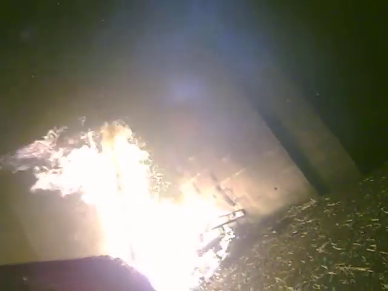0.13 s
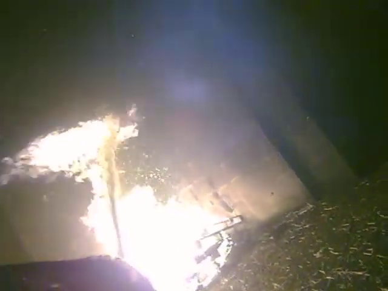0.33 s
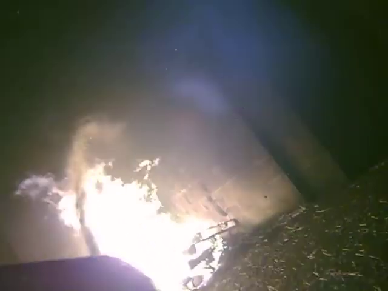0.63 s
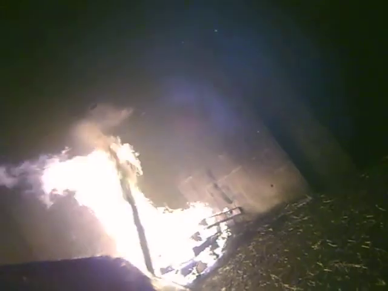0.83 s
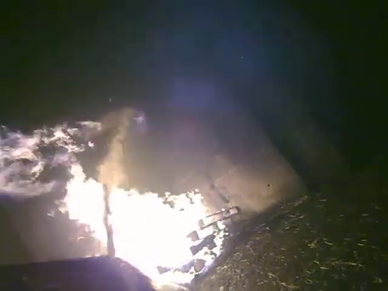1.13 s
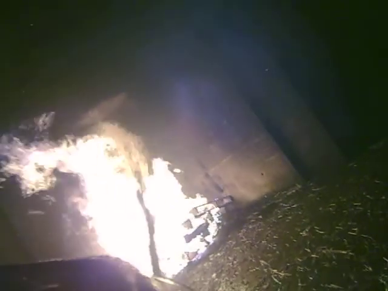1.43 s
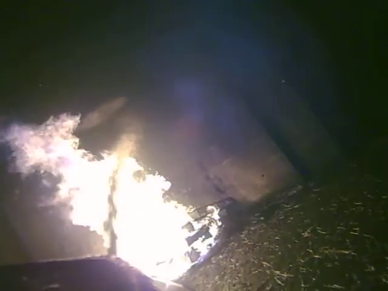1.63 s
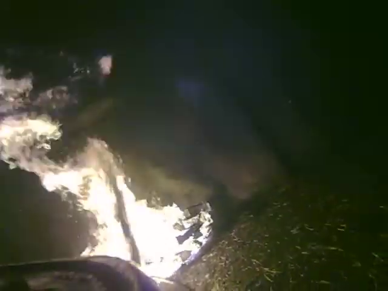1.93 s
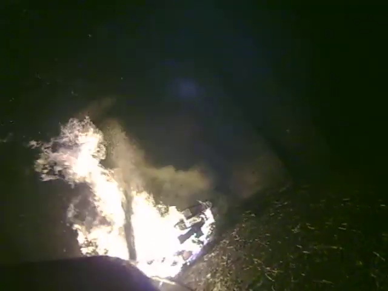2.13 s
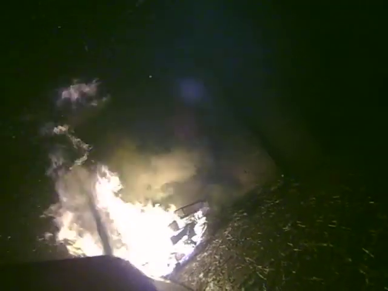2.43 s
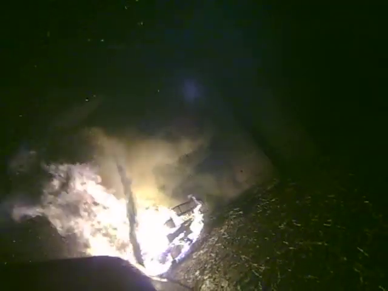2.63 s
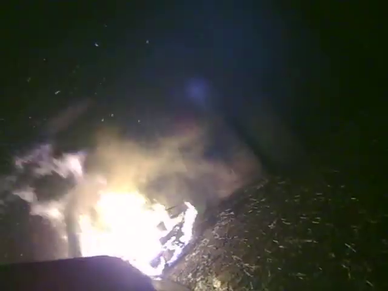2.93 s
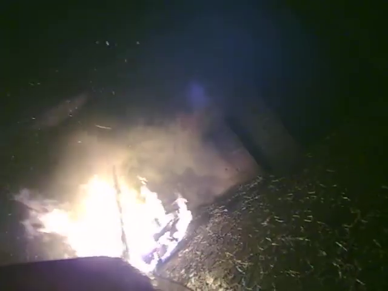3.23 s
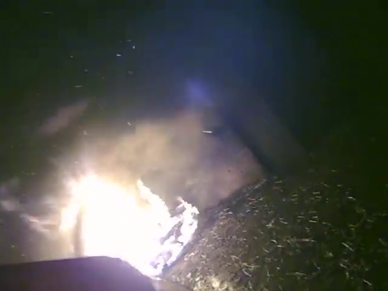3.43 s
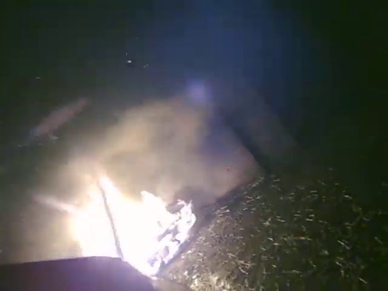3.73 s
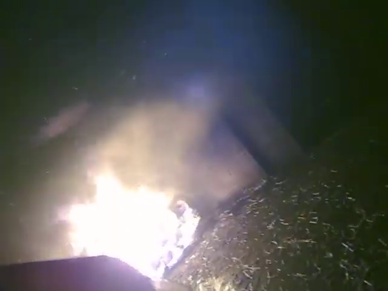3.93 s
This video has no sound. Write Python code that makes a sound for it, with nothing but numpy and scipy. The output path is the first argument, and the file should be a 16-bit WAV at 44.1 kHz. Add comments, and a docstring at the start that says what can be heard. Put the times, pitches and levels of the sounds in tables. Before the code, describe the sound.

A fire hose sprays burning wooden pallets in hissing, spattering sweeps, with occasional dull knocks and a soft rumble of flames underneath.

```python
"""A concrete burn room: a fire hose plays on burning pallets and straw, heard by a camera in a case.
Underneath sit the soft rumble of the flames and a faint low flutter from the camera's electronics.
The jet slackens, opens up again and sweeps the pile about three times a second. Each sweep spatters,
hisses and drums on the wood, then runs off; now and then the jet spits or knocks on a board.
The walls give the water a short tail, and the protective case adds a midrange ring."""
import sys
import numpy as np
from scipy import signal
from scipy.io import wavfile
from scipy.ndimage import uniform_filter1d

SR = 44100
rng = np.random.default_rng(int(sys.argv[2]) if len(sys.argv) > 2 else 0)


def put_to_file(sound):
    """Save the sound as 16-bit audio at rate SR, in the file named by the first command-line argument."""
    columns = np.atleast_2d(sound).T  # one column per channel
    safe = np.clip(columns, -1, 1)
    whole_steps = np.round(safe * 32767)
    wavfile.write(sys.argv[1], SR, whole_steps.astype(np.int16))


N = 179531
TIME = np.arange(N) / SR

# Resonances of the camera case: (frequency [Hz], half-width [Hz], boost [dB])
CASE_RESONANCES = [(1262, 64, 6), (1681, 106, 7.5), (1931, 158, 10.5), (2375, 130, -7.5), (2724, 120, 4.5),
                   (3334, 222, 11), (3930, 130, -2), (3883, 242, 9), (4160, 166, 8), (4790, 270, 4.5),
                   (6870, 160, 1.5), (7460, 340, -4), (8700, 270, 6), (10130, 880, 6.5), (11320, 230, 2.5),
                   (14900, 450, 5)]
# Fuzzy tones while the jet stays on one spot:
# (start [s], end [s], pitch [Hz], width [Hz], level [dB])
DWELL_TONES = [(1.1, 2.4, 218, 60, -41), (.70, .92, 195, 45, -39), (1.45, 2.3, 2670, 140, -35),
               (1.55, 2.14, 5270, 170, -32), (1.35, 1.54, 5550, 350, -34)]
# Dull knocks of the jet on the wood: (time [s], level [dB], pitch [Hz], 60 dB decay time [s])
BOARD_KNOCKS = [(.560, -16.5, 360, 0.054), (0.564, -22.5, 162, 0.088), (.785, -21, 362, 0.061),
                (0.896, -20.5, 483, 0.033), (1.734, -15.5, 78, 0.035), (2.194, -20, 310, 0.054),
                (3.078, -14.5, 183, 0.12)]
# Short spits of spray: (time [s], level [dB], length [s], centre [Hz], half-width [octaves])
JET_SPITS = [(0.066, -16, 0.01, 5800, 1.5), (0.087, -23, 0.014, 6000, 1.4), (0.26, -33, 0.0099, 7000, 0.73),
             (.365, -28.5, 0.043, 4340, .5), (.521, -17, 0.0073, 9000, 1.6), (.578, -15.5, .01, 9000, 2.7),
             (0.709, -21, .005, 12200, .45), (0.873, -18, 0.0058, 7000, 1), (1.102, -16.5, 0.017, 6000, 2),
             (1.375, -23, 0.0077, 10000, .6), (1.394, -21.5, 0.026, 7000, .63),
             (1.956, -16.5, 0.018, 4500, 1), (2.536, -10.5, 0.017, 8000, 1.16),
             (3.075, -16, 0.026, 1540, 0.95), (3.134, -16.5, 0.011, 3520, 0.26),
             (3.46, -15, .012, 10200, 0.49), (3.5, -15.5, 0.015, 5940, 1.2),
             (3.693, -13, 0.0051, 6400, .36)]
# EQ curves of the five water layers: (frequency [Hz], relative level [dB])
SPATTER_EQ = [(500, -39.5), (850, -17.5), (1020, -1.5), (1500, -1), (2100, 0.5), (2600, -8.5), (4000, -13),
              (8000, -36)]
RUSH_EQ = [(1200, -22.5), (2300, 3), (3000, -1.5), (4500, -0.5), (5400, 0), (6300, -7), (8000, -4),
           (14000, -36.5)]
MIST_EQ = [(2000, -24), (4500, -5.5), (6500, -1.5), (8000, -2.5), (10000, -0.5), (11700, 4), (13000, -0.5),
           (13800, -10), (15700, -9.5)]
PATTER_EQ = [(250, -24.5), (420, -7.5), (600, 1.5), (800, -1.5), (1200, -1), (2500, -19), (6000, -38)]
DRUM_EQ = [(30, -13), (90, -2), (140, 0.5), (200, 7), (290, -1), (400, 1.5), (600, -17), (1500, -26.5)]
# The nozzle is throttled, opened again and twice eased a little: (time [s], flow [dB])
NOZZLE_FLOW = [(0, -2.5), (.05, -8), (.105, -8), (.14, -14), (.22, -18), (.28, -13.5), (.36, -12),
               (.372, -6), (.50, -3.5), (.54, 0), (2.05, 0.5), (2.25, -1), (2.5, 0.5), (3.2, 0), (3.37, -2),
               (3.5, 0)]
# Passes of the jet over the pallets, with levels at a flow of 0 dB:
# (start [s], rise [s], hold [s], spatter level [dB], rush level [dB], wood level [dB])
JET_SWEEPS = [(.39, 0.036, .04, -30, -38, -37.5), (0.54, 0.038, 0.17, -21.5, -22.5, -33.5),
              (.73, 0.098, .06, -19, -21, -29.5), (1.083, .07, 0.041, -16.5, -23, -35),
              (1.385, 0.029, 0.13, -20.5, -24.5, -30.5), (1.678, 0.018, 0.023, -20, -20.5, -36),
              (1.913, 0.035, 0.065, -20, -22, -35.5), (2.21, 0.052, .08, -31, -36, -34.5),
              (2.462, 0.014, 0.09, -19.5, -19.5, -31), (2.837, 0.02, 0.047, -27, -23.5, -54),
              (3.068, 0.012, 0.098, -16.5, -20.5, -29.5), (3.456, .04, 0.017, -28.5, -27.5, -46),
              (3.587, .035, 0.045, -18.5, -18.5, -29.5), (3.67, 0.04, 0.073, -19, -23, -35),
              (4.022, .015, 0.011, -37, -31, -32.5)]


def gain_of(db):
    """Decibels to amplitude."""
    return 10 ** (np.asarray(db) / 20)


def unit_rms(x):
    """Scales to an rms of one."""
    return x / np.sqrt(np.mean(x ** 2) + 1e-20)


def add(mix, start_s, sound):
    """Lays a sound into the mix."""
    part = mix[max(round(start_s * SR), 0):][:len(sound)]
    part += sound[:len(part)]


def concrete_room(x, t60_s=0.45, wet_db=-14):
    """Concrete walls return a dense, short tail after a 6 ms pre-delay."""
    t = TIME[:SR // 2]
    tail = rng.standard_normal(len(t)) * gain_of(-60 * t / t60_s) * (t > 0.006)
    return x + gain_of(wet_db) * signal.oaconvolve(x, tail / np.linalg.norm(tail))[:N]


def camera_case(x, eq, size=2048):
    """Applies an EQ curve (dB as a function of Hz) and lets the case ring after every impact."""
    hz = abs(np.fft.fftfreq(size, 1 / SR))
    case_db = sum(boost * np.exp(-((hz - centre) / width) ** 2) for centre, width, boost in CASE_RESONANCES)
    log_gain = np.log(gain_of(eq(hz) + case_db))
    minimum_phase = np.exp(np.conj(signal.hilbert(log_gain)))
    return signal.oaconvolve(x, np.fft.ifft(minimum_phase).real)[:len(x)]


def fire_rumble(level_db=-41, band_hz=(20, 130)):
    """The flames lay down a soft, low bed of noise."""
    band = signal.butter(2, band_hz, "bandpass", fs=SR, output="sos")
    return gain_of(level_db) * unit_rms(signal.sosfilt(band, rng.standard_normal(N)))


def camera_flutter(frame_hz=29.98, deepest_db=-23, width_s=0.0027, jitter_s=0.0013):
    """The camera's supply dips once for each picture, by an uneven amount and not quite on the beat."""
    frame = np.round(TIME * frame_hz).astype(int)
    depth, late_s = rng.uniform([0.2, -jitter_s], [1, jitter_s], (frame[-1] + 1, 2))[frame].T
    from_dip_s = TIME - frame / frame_hz - late_s
    dips = -depth * np.exp(-(from_dip_s / width_s) ** 2) * (frame > 0)
    return gain_of(deepest_db) * (dips - dips.mean())


def dwell_tones():
    """The jet keeps a narrow resonance ringing for as long as it stays on one spot."""
    out = np.zeros(N)
    for start, end, hz, width_hz, db in DWELL_TONES:
        t = TIME[:round((end - start) * SR)]
        smooth = signal.butter(2, width_hz / 2, fs=SR, output="sos")
        waver = signal.sosfilt(smooth, rng.standard_normal(len(t)) + 1j * rng.standard_normal(len(t)))
        ring = unit_rms((waver * np.exp(2j * np.pi * hz * t)).real)
        add(out, start, gain_of(db) * ring * signal.windows.tukey(len(t), 0.5))
    return out


def board_knocks(attack_s=0.003, roughness=0.13):
    """A board thuds on one damped low mode, roughened by the water on it."""
    out, t = np.zeros(N), TIME[:SR // 4]
    for start, db, hz, t60_s in BOARD_KNOCKS:
        grit = unit_rms(uniform_filter1d(rng.standard_normal(len(t)), size=110))
        ring = np.sin(2 * np.pi * hz * t) * (1 + roughness * grit)
        envelope = np.minimum(t / attack_s, 1) * gain_of(-60 * t / t60_s)
        add(out, start, gain_of(db) * envelope * ring)
    return out


def jet_spits(attack_s=0.00088, fade_s=0.0022, top_hz=13000):
    """Bursts of fine spray snap in, hold briefly and die away."""
    out, t = np.zeros(N), TIME[:SR // 8]
    high_cut = signal.butter(3, top_hz, fs=SR, output="sos")
    for start, db, length_s, centre_hz, octaves in JET_SPITS:
        band = lambda hz: -10 * np.log10(1 + (np.log2((hz + 1) / centre_hz) / octaves) ** 4)
        fizz = signal.sosfilt(high_cut, camera_case(rng.standard_normal(len(t)), band))
        envelope = np.minimum(t / attack_s, 1) * np.exp(-np.maximum(t - length_s, 0) / fade_s)
        add(out, start, gain_of(db) * unit_rms(fizz) * envelope)
    return out


def flicker(slow_hz, fast_hz, count=40):
    """A smooth random modulator: sines spread between two rates."""
    t = TIME[::32]
    rates = np.geomspace(slow_hz, fast_hz, count) * rng.uniform(0.9, 1.1, count)
    waves = np.sin(2 * np.pi * (rates[:, None] * t + rng.random((count, 1))))
    return np.interp(TIME, t, unit_rms(waves.sum(0)))


def slugs(per_s, fade_s):
    """A modulator for the jet breaking into slugs of water: each lands at once and drains away."""
    hits = rng.uniform(0.94, 1, N) * (rng.random(N) < per_s / SR)
    decay = np.exp(-1 / (fade_s * SR))
    return unit_rms(signal.lfilter([1], [1, -decay], hits - hits.mean()))


def drops(per_s, spread_db):
    """Drops land as clicks of random sign at random times: many small, a few large."""
    size = gain_of(spread_db * np.minimum(rng.exponential(1, N), 4))
    return unit_rms(size * rng.choice([-1, 1], N) * (rng.random(N) < per_s / SR))


def water(eq_points, surge_db, per_s, spread_db, wash_db):
    """Near drops over a wash of countless far ones, surging together through the room and the case."""
    impacts = drops(per_s, spread_db) + gain_of(wash_db) * rng.standard_normal(N)
    in_room = concrete_room(impacts * gain_of(surge_db))
    eq_hz, eq_db = np.transpose(eq_points)
    eq = lambda hz: np.interp(np.log(hz + 1), np.log(eq_hz), eq_db)
    return unit_rms(camera_case(in_room, eq))


def sweep_envelope(layer, fade_s):
    """Each pass of the jet rises, holds and runs off; overlapping passes add in power."""
    power = np.zeros(N)
    for start, rise, hold, spatter_db, rush_db, wood_db in JET_SWEEPS:
        db = {"spatter": spatter_db, "rush": rush_db, "wood": wood_db}[layer]
        t = TIME - start
        envelope = np.clip(t / rise, 0, 1) * np.exp(-np.maximum(t - rise - hold, 0) / fade_s)
        power += (gain_of(db) * envelope) ** 2
    return np.sqrt(power)


def fader(sweeps, bed_db, drift_db_per_s, flow_exponent):
    """A layer's gain: a slowly drifting bed plus the sweeps, both riding the nozzle's flow."""
    flow_db = np.interp(TIME, *np.transpose(NOZZLE_FLOW))
    bed = gain_of(bed_db + drift_db_per_s * (TIME - TIME.mean()))
    return gain_of(flow_exponent * flow_db) * np.hypot(bed, sweeps)


def hose_spray(mist_send_db=-4, drum_send_db=-4):
    """Coarse drops spatter, the stream rushes, mist hisses, wood patters and drums, on shared slugs."""
    surge = slugs(per_s=80, fade_s=0.0073)
    puffs = slugs(per_s=13, fade_s=0.025)  # rarer, larger slugs burst into mist
    spatter = water(SPATTER_EQ, 0.64 * surge + 0.91 * flicker(12, 50), per_s=2500, spread_db=2, wash_db=1.5)
    rush = water(RUSH_EQ, 0.5 * surge + 0.5 * puffs, per_s=4000, spread_db=2, wash_db=-1.5)
    mist = water(MIST_EQ, 0.57 * surge + 0.7 * puffs, per_s=7000, spread_db=3, wash_db=2.5)
    patter = water(PATTER_EQ, 0.48 * surge + 0.82 * flicker(10, 23), per_s=1200, spread_db=2, wash_db=-2.5)
    drum = water(DRUM_EQ, 0.51 * surge + 0.5 * flicker(5.7, 30), per_s=700, spread_db=1.5, wash_db=2)
    splash = sweep_envelope("spatter", fade_s=0.14)
    gush = sweep_envelope("rush", fade_s=0.14)
    blow = sweep_envelope("wood", fade_s=0.11)
    haze = gain_of(mist_send_db) * gush
    thump = gain_of(drum_send_db) * blow
    return (spatter * fader(splash, bed_db=-24, drift_db_per_s=-1, flow_exponent=1.12)
            + rush * fader(gush, bed_db=-22.5, drift_db_per_s=-0.17, flow_exponent=1.21)
            + mist * fader(haze, bed_db=-23.5, drift_db_per_s=1, flow_exponent=0.57)
            + patter * fader(blow, bed_db=-39, drift_db_per_s=-0.6, flow_exponent=1)
            + drum * fader(thump, bed_db=-42, drift_db_per_s=-0.5, flow_exponent=0.87))


def scene():
    """The mono mix: the hose up front, camera flutter and fire underneath."""
    hose = hose_spray() + dwell_tones() + jet_spits() + board_knocks()
    return (hose + camera_flutter() + fire_rumble())[None]


def record(dry):
    """The camera soft-clips the highest peaks and cuts the extreme treble."""
    rounded = dry / (1 + dry ** 6) ** (1 / 6)
    high_cut = signal.firwin(701, cutoff=15750, window=("kaiser", 9), fs=SR)
    return signal.oaconvolve(rounded, high_cut[None], "same")


dry = scene()
out = record(dry)
put_to_file(out)
```